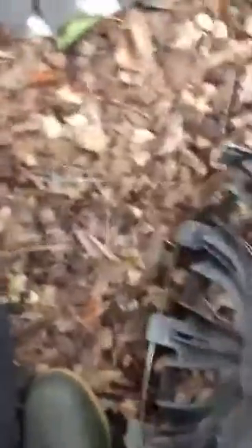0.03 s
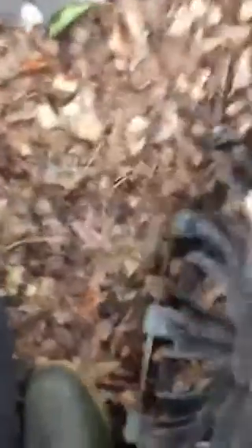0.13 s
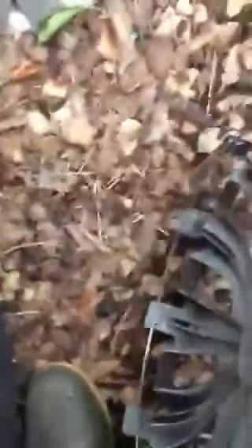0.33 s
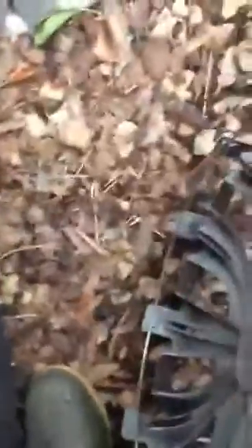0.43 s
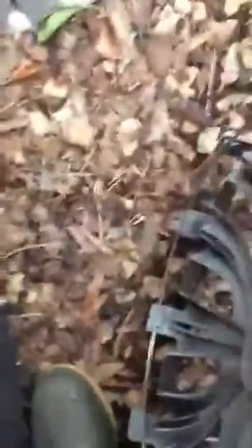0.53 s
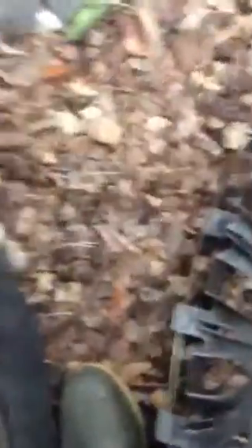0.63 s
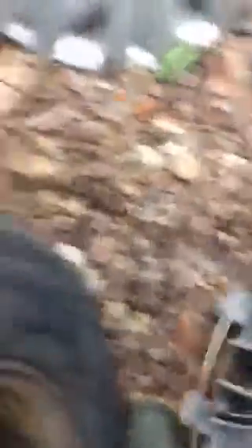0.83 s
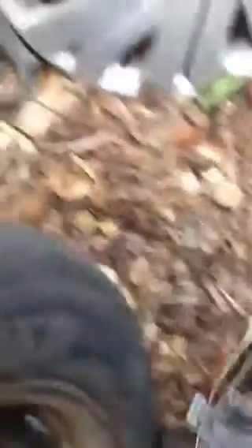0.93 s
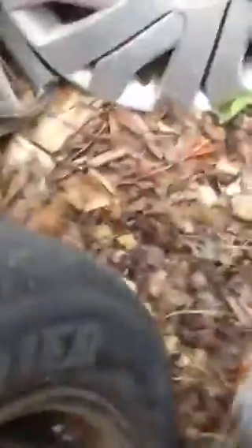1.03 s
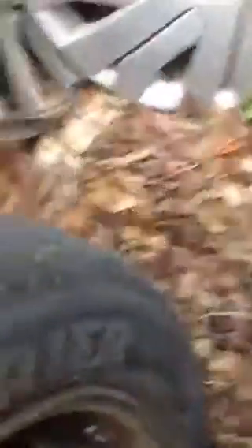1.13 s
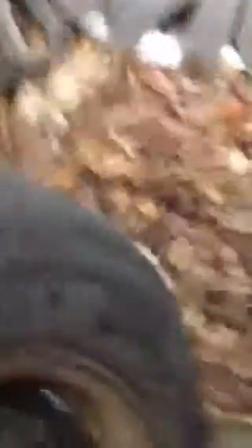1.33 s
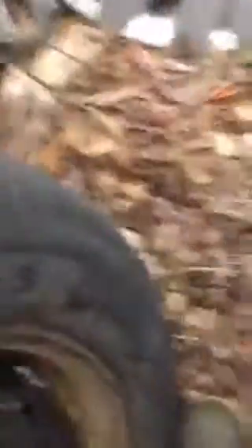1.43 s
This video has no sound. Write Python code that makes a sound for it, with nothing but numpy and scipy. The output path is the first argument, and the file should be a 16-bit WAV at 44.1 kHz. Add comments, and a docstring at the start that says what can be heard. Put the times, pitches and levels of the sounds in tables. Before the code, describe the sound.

One loud plastic crack from a hubcap, then faint taps and a brief hollow clatter.

```python
"""A plastic hubcap snaps once, loudly: a pressure pulse, a crack and a brief modal ring,
scattered by the car beside it and the ground. Handling adds light ticks and dull taps;
clothes and dry leaves rustle by friction. A hollow plastic part is put down with a short
clatter and a soft boom. Quiet outdoor air lies underneath."""
import sys
import numpy as np
from scipy import signal
from scipy.io import wavfile

SR = 44100
rng = np.random.default_rng(int(sys.argv[2]) if len(sys.argv) > 2 else 0)


def digitize_waveform(pressure):
    """Quantize a signal to 16-bit integers and store it at the path in sys.argv[1].

    Rows of a 2-D input are taken as channels; values are limited to [-1, 1].
    """
    field = np.atleast_2d(pressure).T
    bounded = np.clip(field, -1, 1)
    quanta = np.round(bounded * 32767).astype(np.int16)
    wavfile.write(sys.argv[1], SR, quanta)


N = 66150
TIME_S = np.arange(N) / SR

# Outdoor air. Each row: frequency in Hz, relative density in dB.
AIR_SPECTRUM = [(25, -28), (60, -31), (120, 0), (220, -6), (500, -6), (1000, -9.5), (2600, -13.5),
                (5000, -21.5), (15000, -24.5)]
# Air level, dipping after the snap. Each row: time in seconds, gain in dB.
AIR_GAIN = [(0, 1), (.13, 1.5), (.22, 1), (.35, -3.5), (.52, -5.5), (.7, -7), (1.1, 4.5), (1.5, 3.5)]

# Clothes and leaves. Each row: centre in seconds, level in dB, half width in seconds, tilt in dB/octave.
SWISHES = [(.05, -65.5, 0.026, 3.6), (0.1, -59, 0.026, 3.2), (0.758, -57.5, 0.092, -1),
           (1.0, -62.5, 0.11, 0), (1.151, -53, 0.013, 1.5), (1.196, -60, .01, 7), (1.37, -64.5, 0.044, 2),
           (1.497, -58, 0.021, 0.5)]
# Friction noise. Each row: frequency in Hz, relative density in dB.
SWISH_SPECTRUM = [(100, -12), (500, 0), (1400, -6), (3200, 6.5), (6000, -6.5), (11500, -5), (15000, -11.5)]

# Plastic scuffs. Each row: start in seconds, level in dB, attack and T60 in seconds, tilt in dB/octave.
TICKS = [(.401, -65, 0.0018, 0.15, -4), (0.421, -53, 0.0086, 0.076, -4), (0.5641, -56, 0.0014, 0.099, 0),
         (1.2074, -43, 0.00056, 0.075, -1)]
# Scuff noise. Each row: frequency in Hz, relative density in dB.
TICK_SPECTRUM = [(40, -44), (150, -17), (600, -11), (1300, -12), (2600, -1.5), (4000, -4.5), (7500, -3),
                 (12000, -11), (15000, -9)]
# One-note taps. Each row: start in seconds, level in dB, pitch in Hz, attack and T60 in seconds.
TAPS = [(.185, -55.5, 432, 0.00076, .04), (.430, -54, 450, 0.0018, 0.16), (.689, -47.5, 325, 0.0025, 0.062),
        (.693, -43.5, 230.5, 0.0042, .11), (1.021, -48, 506, 0.0009, 0.022),
        (1.034, -48.5, 415, 0.00071, 0.015), (1.2078, -41, 3510, .0005, 0.073)]

# Contacts of the part put down. Each row: start in seconds, gain in dB, tilt in dB/octave.
CONTACTS = [(1.219, 1, -0.5), (1.261, -7, -0.5), (1.282, -6, 0), (1.398, -18.5, -1)]
# Contact crunch. Each row: frequency in Hz, relative density in dB.
CRUNCH_SPECTRUM = [(40, -37), (130, -5), (500, 1), (1400, -0.5), (3000, -2), (6000, -6), (11000, -9.5),
                   (15000, -10.5)]
# Crunch decay. Each row: frequency in Hz, T60 in seconds.
CRUNCH_DECAY = [(150, 0.28), (1500, 0.18), (5000, 0.12), (14000, 0.15)]
# The part's hollow body. Each row: frequency in Hz, relative level in dB, T60 in seconds.
HOLLOW_MODES = [(542, -47.5, 0.31), (794, -58, .17), (914, -56.5, 0.18), (1647, -49.5, 0.14)]
# Low modes that swell as it settles. Each row: frequency in Hz, level in dB, T60 in seconds.
BOOM_MODES = [(129.3, -49.5, 0.16), (425.8, -52.5, 0.17)]

# Light catch, then main blow. Each row: start in seconds, gain in dB.
SNAP_BLOWS = [(0.2382, -17.5), (0.2405, 0.5)]
# Strongest hubcap modes. Each row: frequency in Hz, relative level in dB, T60 in seconds.
HUBCAP_MODES = [(407, -44, 0.17), (432, -27.4, 0.034), (816, -32.1, 0.067), (1075, -26.1, 0.031),
                (1438, -27.2, 0.057), (1758, -22.1, 0.018), (2025, -19.5, 0.045), (2472, -28.3, 0.067),
                (2682, -26.2, 0.061), (3032, -24.5, 0.049), (3651, -14.2, 0.022), (4420, -18.9, 0.031),
                (4622, -19.8, 0.035), (4875, -21.0, 0.026), (5173, -16.8, 0.018), (5642, -20.6, 0.035),
                (5898, -26.7, 0.054), (6673, -14.3, 0.02), (7513, -18.1, 0.024), (8012, -16.3, 0.018),
                (8256, -18.5, 0.03), (8711, -16.1, 0.022), (9535, -30.4, 0.047), (10433, -19.2, 0.03),
                (10911, -21.9, 0.024), (11167, -26.5, 0.04), (12714, -19.1, 0.018), (13625, -19.2, 0.018)]
# Its crowd of weak modes. Each row: frequency in Hz, relative density in dB.
CRACK_SPECTRUM = [(40, -34.5), (130, -22.5), (300, -5.5), (650, -6), (1100, -5), (2500, -3.5), (5000, -3),
                  (8000, -3), (9700, -4), (13000, 1), (14300, -7.5), (16000, -17.5)]
# Their decay. Each row: frequency in Hz, T60 in seconds.
CRACK_DECAY = [(100, 0.019), (400, 0.04), (1200, 0.075), (4000, 0.03), (14000, 0.035)]
# Scatter from car and ground. Each row: frequency in Hz, relative density in dB.
SCATTER_SPECTRUM = [(60, -29.5), (300, -1), (900, -3.5), (2000, -6), (4500, -3), (9000, -4.5),
                    (15000, -14.5)]


def from_db(db):
    """Decibels to gain."""
    return 10 ** (np.asarray(db) / 20)


def at_hz(table, hz):
    """Table lookup on a log-frequency axis."""
    freqs_hz, values = np.transpose(table)
    return np.interp(np.log(hz), np.log(freqs_hz), values)


def butter(x, order, edges_hz, kind):
    """Butterworth filter."""
    return signal.sosfilt(signal.butter(order, edges_hz, kind, fs=SR, output="sos"), x)


def envelope(start_s, attack_s, t60_s, hold_s=0):
    """Linear rise, optional hold, exponential decay."""
    age_s = TIME_S - start_s
    decay_s = np.maximum(age_s - attack_s - hold_s, 0)
    return np.clip(age_s / attack_s, 0, 1) * from_db(-60 * decay_s / t60_s)


def noise_bands(spectrum, tilt_db_oct=0):
    """Half-octave noise keyed by centre in Hz; sums to RMS 1 before the tilt about 3 kHz."""
    edges_hz = np.geomspace(22, 17000, 21)
    centres_hz = np.sqrt(edges_hz[1:] * edges_hz[:-1])
    white = rng.standard_normal((2, N + SR // 4))
    bands = np.array([butter(white[k % 2], 2, edges_hz[k:k + 2], "band")[-N:] for k in range(20)])
    bands *= from_db(at_hz(spectrum, centres_hz))[:, None]
    bands /= bands.sum(0).std()
    bands *= from_db(tilt_db_oct * np.log2(centres_hz / 3000))[:, None]
    return dict(zip(centres_hz, bands))


def noise(spectrum, tilt_db_oct=0):
    """Shaped broadband noise."""
    return sum(noise_bands(spectrum, tilt_db_oct).values())


def burst(bands, decay, start_s, attack_s, hold_s=0):
    """Dense modes struck at once, each band dying at its own rate."""
    return sum(band * envelope(start_s, attack_s, at_hz(decay, hz), hold_s) for hz, band in bands.items())


def ring(modes, start_s, attack_s):
    """Damped sines of alternating sign, set off together."""
    out = np.zeros(N)
    for k, (hz, db, t60_s) in enumerate(modes):
        sine = (-1) ** k * np.sin(2 * np.pi * hz * (TIME_S - start_s))
        out += from_db(db) * envelope(start_s, attack_s, t60_s) * sine
    return out


def air(level_db=-65.5):
    """Quiet, dull outdoor background."""
    gain_db = np.interp(TIME_S, *np.transpose(AIR_GAIN))
    return from_db(level_db + gain_db) * noise(AIR_SPECTRUM)


def rustle(grain_db=1, grain_hz=400):
    """Grainy friction of clothes and leaves, swelling with each movement."""
    swishes = np.zeros(N)
    for centre_s, db, half_width_s, tilt_db_oct in SWISHES:
        swell = np.exp(-0.5 * ((TIME_S - centre_s) / half_width_s) ** 2)
        swishes += from_db(db) * swell * noise(SWISH_SPECTRUM, tilt_db_oct)
    grain = butter(rng.standard_normal(N), 2, grain_hz, "low")
    return swishes * from_db(grain_db * grain / grain.std())


def handling():
    """Small scuffs and damped taps on the plastic."""
    out = np.zeros(N)
    for start_s, db, attack_s, t60_s, tilt_db_oct in TICKS:
        out += from_db(db) * envelope(start_s, attack_s, t60_s) * noise(TICK_SPECTRUM, tilt_db_oct)
    for start_s, db, hz, attack_s, t60_s in TAPS:
        out += ring([(hz, db, t60_s)], start_s, attack_s)
    return out


def clatter(crunch_db=-37):
    """Each contact crunches and rings the hollow part; it settles with a soft boom."""
    out = ring(BOOM_MODES, start_s=1.222, attack_s=0.083)
    for start_s, db, tilt_db_oct in CONTACTS:
        bands = noise_bands(CRUNCH_SPECTRUM, tilt_db_oct)
        crunch = from_db(crunch_db) * burst(bands, CRUNCH_DECAY, start_s, attack_s=0.00033)
        body = ring(HOLLOW_MODES, start_s, attack_s=0.0045)
        out += from_db(db) * (crunch + body)
    return out


def pressure_pulse(start_s, gain_db=-1, band_hz=(600, 7000)):
    """One short pulse as the plastic springs over."""
    impulse = signal.unit_impulse(N, int(start_s * SR))
    return from_db(gain_db) * butter(impulse + 1e-18, 1, band_hz, "band")  # offset avoids denormals


def hubcap_snap(attack_s=0.00025, crack_db=-19, scatter_db=-38):
    """The hubcap cracks and rings briefly; car and ground return a faint tail."""
    bands = noise_bands(CRACK_SPECTRUM)
    scatter = from_db(scatter_db) * noise(SCATTER_SPECTRUM)
    out = np.zeros(N)
    for start_s, db in SNAP_BLOWS:
        modes = ring(HUBCAP_MODES, start_s, attack_s)
        crack = from_db(crack_db) * burst(bands, CRACK_DECAY, start_s, attack_s, hold_s=0.0027)
        tail = scatter * envelope(start_s, attack_s=0.012, t60_s=0.15)
        out += from_db(db) * (pressure_pulse(start_s) + modes + crack + tail)
    return out


def scene():
    """All sources at one close microphone."""
    return (hubcap_snap() + clatter() + handling() + rustle() + air())[None]


def record(dry, low_cut_hz=65, notch_hz=14800, ceiling=0.9, high_cut_hz=15250):
    """Microphone: bass cut, narrow treble dip, soft clip, steep top cut."""
    thinned = butter(dry, 2, low_cut_hz, "high")
    notched = signal.lfilter(*signal.iirnotch(notch_hz, Q=27, fs=SR), thinned)
    rounded = ceiling * np.tanh(notched / ceiling)
    return signal.sosfilt(signal.ellip(10, 0.2, 80, high_cut_hz, fs=SR, output="sos"), rounded)


dry = scene()
out = record(dry)
digitize_waveform(out)
```